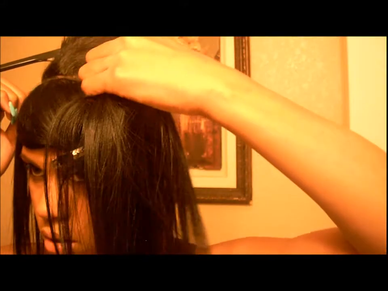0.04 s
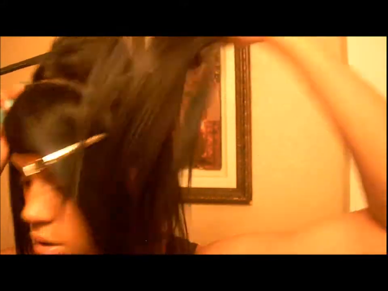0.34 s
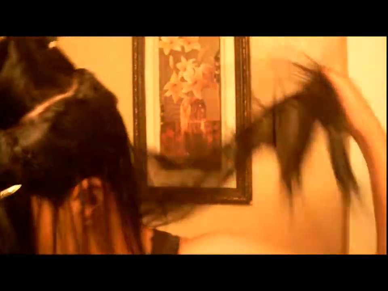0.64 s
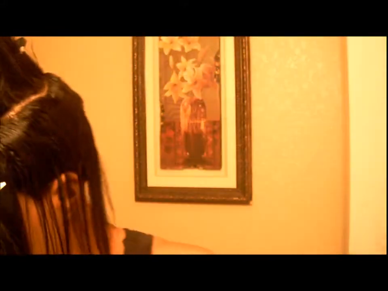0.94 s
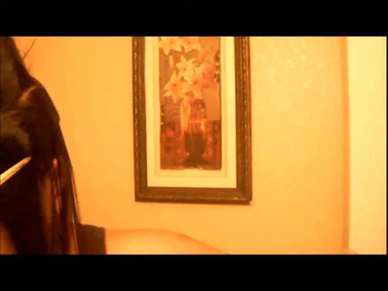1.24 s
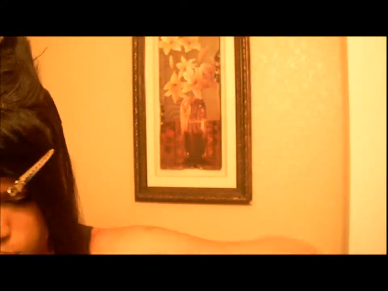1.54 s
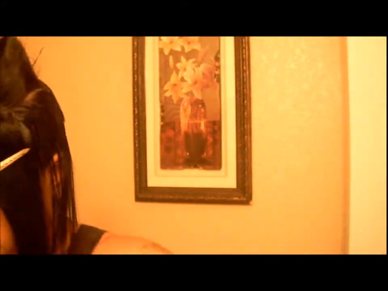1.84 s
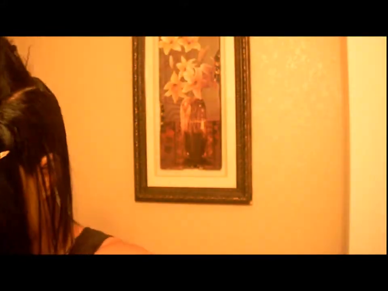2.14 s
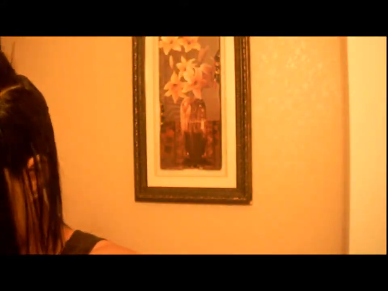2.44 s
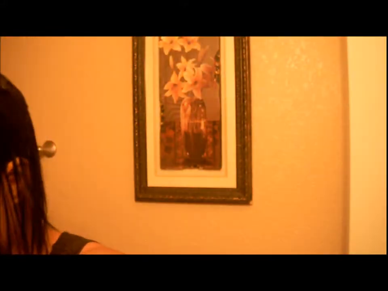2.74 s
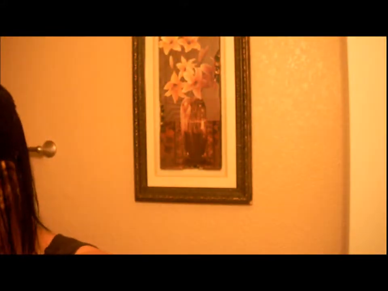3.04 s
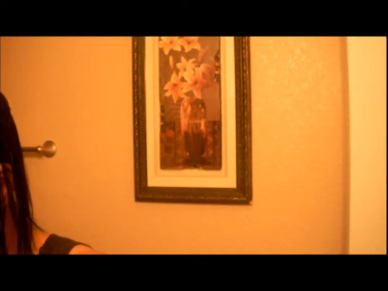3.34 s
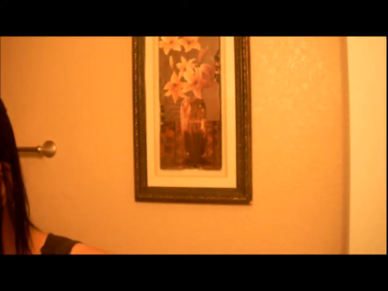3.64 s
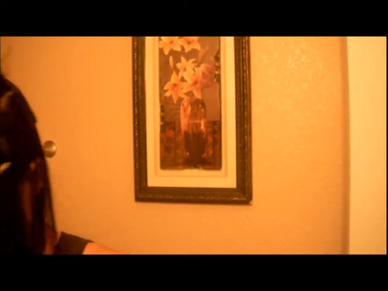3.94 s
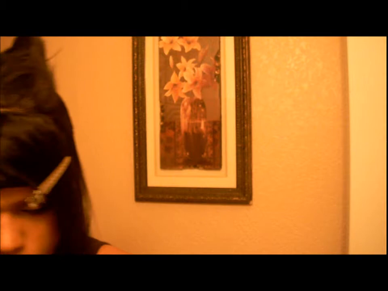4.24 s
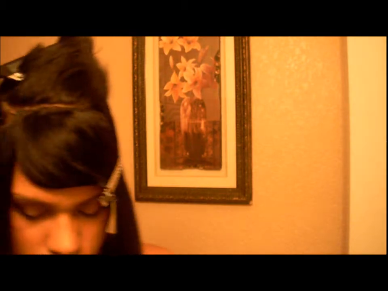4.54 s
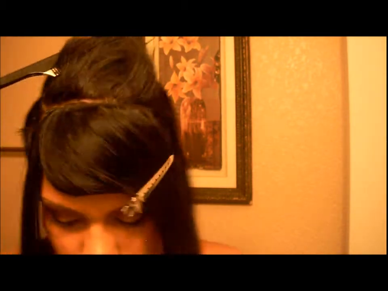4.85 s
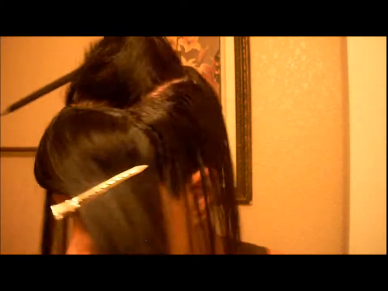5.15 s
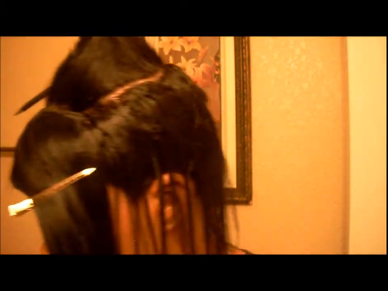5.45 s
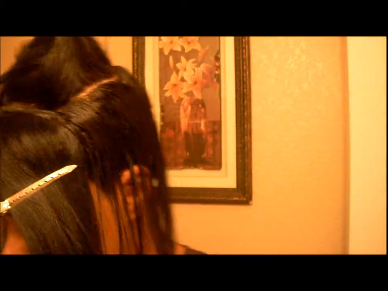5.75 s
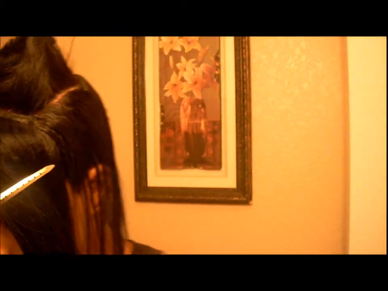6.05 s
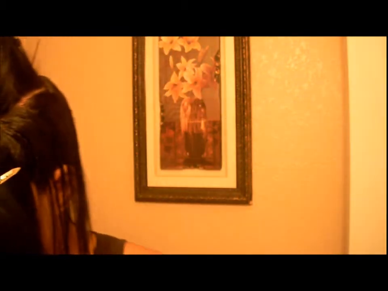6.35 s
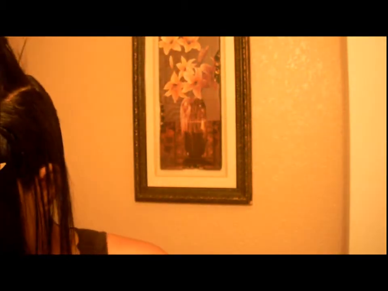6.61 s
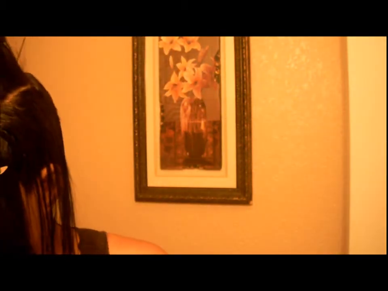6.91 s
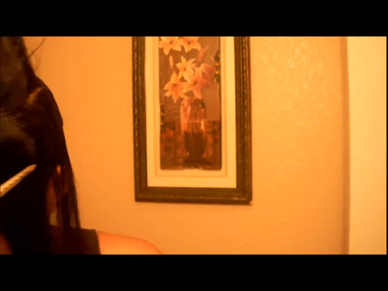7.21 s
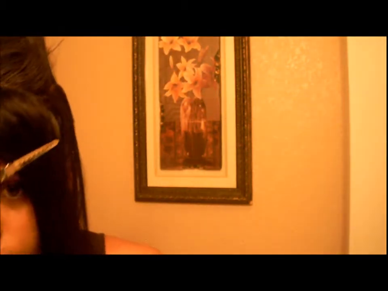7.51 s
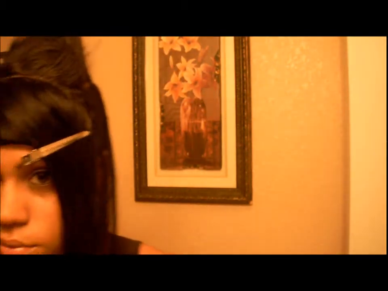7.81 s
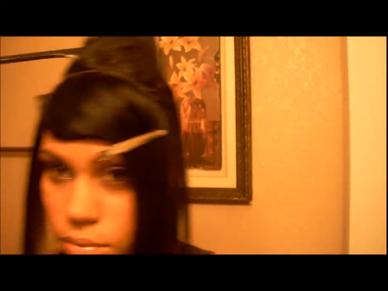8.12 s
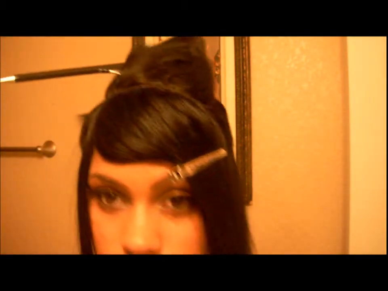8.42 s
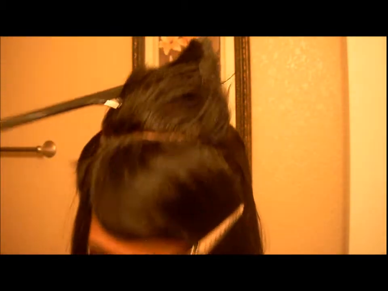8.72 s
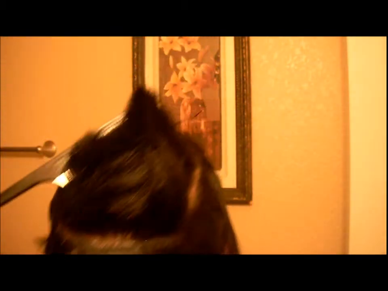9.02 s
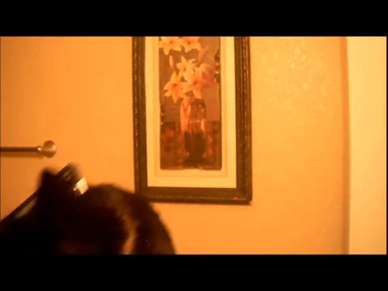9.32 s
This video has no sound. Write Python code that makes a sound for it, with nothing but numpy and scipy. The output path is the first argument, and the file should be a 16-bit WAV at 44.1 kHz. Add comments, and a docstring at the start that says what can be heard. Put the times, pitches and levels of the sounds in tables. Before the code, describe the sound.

In a small, hard-walled bathroom, plastic hair clips tap and snap shut with soft knocks on a counter. A heavy hair tool is put down hard and rattles to rest, the hollow cabinet booming below. After a brief scrape, another clip snaps with a thud, a comb drops and hair rustles faintly. The close microphone adds hiss and a thin, pulsing whine.

```python
"""A heavy hair tool is put down hard on a counter and rattles to rest in a small, hard-walled bathroom.
Its casing cracks, the counter top rings and the hollow cabinet below booms. Around it, plastic clips
snap and tap, a comb drops and padded knocks thud, each exciting resonances and wall reflections.
Plastic scrapes once, briefly; later, hair rustles faintly.
Under it all lie a close camera's hiss and thin, pulsing whine."""
import sys
import numpy as np
from scipy import signal
from scipy.fft import rfft, irfft
from scipy.io import wavfile
from scipy.ndimage import uniform_filter1d

SR = 44100
rng = np.random.default_rng(int(sys.argv[2]) if len(sys.argv) > 2 else 0)


def pcm_store(signal):
    """Save signal as 16-bit PCM."""
    levels = np.round(np.clip(np.atleast_2d(signal), -1, 1) * 32767)
    wavfile.write(sys.argv[1], SR, levels.astype(np.int16).T)


N = 422037
EVENT_N = 32768
AGE_S = np.arange(EVENT_N) / SR
FREQ_HZ = np.maximum(np.arange(EVENT_N // 2 + 1) * SR / EVENT_N, 1)


def undb(db):
    """dB to gain."""
    return 10 ** (np.asarray(db) / 20)


def at_rms(x, db):
    """Scale to an rms level."""
    return x * undb(db) / np.sqrt(np.mean(x ** 2))


def curve(points, hz):
    """Interpolate (f/Hz, value) points over log frequency."""
    point_hz, value = np.transpose(points)
    return np.interp(np.log(hz), np.log(point_hz), value)


def add(out, t_s, sound):
    """Mix in at t_s."""
    start = int(t_s * SR)
    out[start:start + len(sound)] += sound[:N - start]


def convolve(a, b):
    """Convolution cut to one event's length."""
    return signal.fftconvolve(a, b)[:EVENT_N]


def decay(t60_s):
    """Envelope falling 60 dB in t60_s."""
    return np.exp(-np.log(1000) * AGE_S / t60_s)


def pulse(spectrum_db):
    """One contact: the minimum-phase pulse with this spectrum."""
    cepstrum = irfft(spectrum_db * np.log(10) / 20)
    cepstrum[1:EVENT_N // 2] *= 2
    cepstrum[EVENT_N // 2 + 1:] = 0
    return irfft(np.exp(rfft(cepstrum)))


def hump_db(centre_hz, width_oct):
    """Broad resonance of a small, well damped object."""
    return -11 * np.log10(1 + (np.log2(FREQ_HZ / centre_hz) / width_oct) ** 4)


def softness_db(cutoff_hz, order=2):
    """Treble lost in a longer contact."""
    return -10 * np.log10(1 + (FREQ_HZ / cutoff_hz) ** (2 * order))


def ring(modes, detune=0.0016):
    """Decaying modes, slightly detuned at each blow."""
    out = np.zeros(EVENT_N)
    for hz, db, t60_s in modes:
        detuned_hz = hz * (1 + detune * rng.standard_normal())
        out += undb(db) * np.sin(2 * np.pi * detuned_hz * AGE_S) * decay(t60_s)
    return out


def plastic_ring(modes, polarity):
    """Short, wide modes; polarity -1 alternates signs, +1 leaves deep valleys between neighbours."""
    out = np.zeros(EVENT_N)
    for k, (hz, width_hz, db) in enumerate(modes):
        gain = polarity ** k * undb(db) * 2 * np.pi * width_hz / SR
        out += gain * np.sin(2 * np.pi * hz * AGE_S) * np.exp(-np.pi * width_hz * AGE_S)
    return out


def crack(t60_s):
    """Dense, quickly damped modes as a unit-energy noise burst."""
    burst = rng.standard_normal(EVENT_N) * decay(t60_s)
    return burst / np.linalg.norm(burst)


def bathroom(onset_s=0.0024, merge_s=0.014):
    """Wall reflections merge into a tail whose treble dies first."""
    # reverberation: f/Hz, t60/s
    room_decay = [(60, 0.96), (250, 0.35), (700, 0.43), (1500, 0.44), (3000, 0.36), (6000, 0.37),
                  (14000, 0.24)]
    noise, scatter = rng.standard_normal((2, EVENT_N))
    spread = np.exp(-AGE_S / merge_s)  # early reflections stand out singly
    onset = np.minimum(AGE_S / onset_s, 1) ** 2
    echoes = rfft(noise * np.exp(spread * scatter - spread ** 2) * onset)
    centres_hz = np.transpose(room_decay)[0]
    tail = np.zeros(EVENT_N)
    for (_, t60_s), share in zip(room_decay, np.eye(len(centres_hz))):
        fade = decay(t60_s)
        band = irfft(echoes * np.interp(np.log(FREQ_HZ), np.log(centres_hz), share))
        tail += band * fade / np.linalg.norm(fade)
    return tail


def air_path(direct_db):
    """Direct sound plus wall reflections."""
    return undb(direct_db) * (AGE_S == 0) + bathroom()


def hiss(noise_db=-49.5, hum_hz=120, hum_db=-65):
    """Microphone hiss, room rumble and weak mains hum."""
    # noise spectrum: f/Hz, relative density/dB
    colour = [(10, -18), (20, -1.5), (45, -4), (87, -8), (122, -10), (160, -12), (240, -12.5), (450, -17),
              (1000, -20), (1500, -22.5), (2030, -22.5), (3540, -26.5), (7300, -28.5), (15500, -31)]
    hz = np.maximum(np.arange(N // 2 + 1) * SR / N, 1)
    noise = irfft(rfft(rng.standard_normal(N)) * undb(curve(colour, hz)), N)
    hum = np.sin(2 * np.pi * hum_hz * np.arange(N) / SR)
    return at_rms(noise, noise_db) + at_rms(hum, hum_db)


def whine(frame_hz=14.983):
    """Thin tones of the camera's electronics; the strongest pulses at the frame rate."""
    # tones: f/Hz, undipped rms level/dB, dip depth/0-1
    tones = [(5860, -82, 0), (7870, -63.5, 0.66), (11800, -79, 0), (15735, -95, 0)]
    t_s = np.arange(N) / SR
    idle = np.cos(2 * np.pi * (frame_hz * t_s - 1 / 3)) < 0
    dip = uniform_filter1d(idle.astype(float), size=100)
    return sum(at_rms(np.sin(2 * np.pi * hz * t_s), db) * (1 - depth * dip) for hz, db, depth in tones)


def scrape_and_brushes(width_oct=1.0, grain_db=4):
    """A short scrape of plastic, then faint brushes of hair: tiny slips swell and fade in each."""
    # friction strokes: t/s, length/s, level before envelope/dB, centre f/Hz
    strokes = [(5.199, 0.039, -47.5, 2680), (7.59, 0.12, -55.5, 4500), (7.714, 0.11, -53.5, 3080),
               (8.297, 0.058, -49.5, 3780), (8.383, 0.11, -47, 2000)]
    out = np.zeros(N)
    for t_s, length_s, db, hz in strokes:
        slips = rng.standard_normal(EVENT_N) * undb(grain_db * rng.standard_normal(EVENT_N))
        swell = np.sin(np.pi * np.minimum(AGE_S / length_s, 1))
        colour = pulse(hump_db(hz, width_oct))
        friction = convolve(at_rms(slips, db) * swell, colour / np.linalg.norm(colour))
        add(out, t_s, convolve(friction, air_path(direct_db=-1.2)))
    return out


def light_taps(t60_s=0.0062, cutoff_hz=14500, direct_db=-6):
    """Comb and clips tap each other, at a new spot each time."""
    # taps: t/s, level/dB, centre f/Hz
    taps = [(0.989, -3.2, 5140), (1.031, -13, 5500), (1.511, -13.5, 11000), (2.102, -14, 5800),
            (3.417, -6.5, 3600), (3.809, -19, 3600), (5.2, -9, 1300), (6.19, -7.5, 3080),
            (6.549, -12, 2100), (6.556, -1.5, 2240), (6.573, -2, 10500), (7.198, -13, 12000)]
    out = np.zeros(N)
    for t_s, db, hz in taps:
        width_oct = 1.17 * (3970 / hz) ** 0.5  # smaller parts ring higher and narrower
        contact = pulse(db + hump_db(hz, width_oct) + softness_db(cutoff_hz, order=4))
        add(out, t_s, convolve(contact, undb(direct_db) * crack(t60_s) + bathroom()))
    return out


def comb_drop():
    """One end of the comb hits the counter just before the other."""
    # landings: t/s, level/dB, direct over room/dB
    landings = [(7.0882, 6.5, -1), (7.093, 6, -3)]
    # comb resonances: f/Hz, width/Hz, level/dB
    modes = [(620, 160, -7), (1150, 300, -7), (2200, 650, -2), (2590, 310, 2.5), (3620, 520, -3),
             (4580, 540, -2.5), (5800, 1300, -4), (7400, 1250, -4), (8650, 1400, -5.5),
             (10500, 1500, -11.5), (13200, 1500, -13)]
    clack = plastic_ring(modes, polarity=-1)
    out = np.zeros(N)
    for t_s, db, direct_db in landings:
        add(out, t_s, undb(db) * convolve(clack, air_path(direct_db)))
    return out


def hair_clip():
    """A spring shuts the jaws and the plastic rings briefly."""
    # snaps: t/s, level/dB, cutoff/Hz, direct over room/dB
    snaps = [(1.1116, 11, 13000, -2.5), (6.572, 9.5, 3900, -20)]
    # hair clip resonances: f/Hz, width/Hz, level/dB
    modes = [(1170, 36, -12), (1530, 25, 2), (2500, 130, -2), (3200, 120, -3), (3560, 270, -6.5),
             (4600, 280, -2.5), (5270, 380, -3.5), (5930, 510, -8), (6970, 550, -7), (8340, 780, -10),
             (9840, 550, -10), (11400, 640, -16), (14200, 900, -19)]
    out = np.zeros(N)
    for t_s, db, cutoff_hz, direct_db in snaps:
        snap = convolve(pulse(db + softness_db(cutoff_hz)), plastic_ring(modes, polarity=1))
        add(out, t_s, convolve(snap, air_path(direct_db)))
    return out


def cabinet_boom():
    """The hollow cabinet under the counter rings after a blow."""
    # cabinet resonances: f/Hz, level/dB, t60/s
    modes = [(64, -54, .2), (117.5, -46, .44), (140, -50, .3), (214, -54, .35), (251, -53, .58),
             (324, -53, .45), (419, -58, .45), (643, -53, .22), (1070, -57, .25), (1460, -50, .2)]
    return ring(modes)


def counter_knocks(settle_s=0.018, air_db=-4, boom_db=-3.5):
    """Padded blows push on the counter, then settle with a weaker, duller push."""
    # soft contacts: t/s, level/dB, cutoff/Hz
    knocks = [(0.992, 15, 135), (1.043, 11.5, 420), (1.124, 13.5, 292), (3.416, 12, 140),
              (3.4745, 25.5, 140), (6.572, 17.5, 620), (7.0901, 6.5, 420), (7.154, 13, 130),
              (7.198, 8, 700)]
    # knock spectrum: f/Hz, level/dB
    colour = [(25, -20), (70, -9), (120, 1.5), (180, 3.5), (280, 4), (450, 2), (700, 4.5), (1500, 7),
              (16000, 29)]
    out = np.zeros(N)
    for t_s, db, cutoff_hz in knocks:
        delay_s = settle_s * np.exp(0.302 * rng.standard_normal())
        pushes = [(t_s, db, cutoff_hz), (t_s + delay_s, db - 5, cutoff_hz * 0.68)]
        for push_s, push_db, push_hz in pushes:
            push = pulse(push_db + softness_db(push_hz) + curve(colour, FREQ_HZ))
            response = undb(air_db) * air_path(direct_db=-6) + undb(boom_db) * cabinet_boom()
            add(out, push_s, convolve(push, response))
    return out


def heavy_tool(crack_t60_s=0.015, ring_db=-22, boom_db=-4):
    """The tool lands on a hard edge, tips onto its softer side and bounces, ever weaker and duller."""
    # landing and bounces: t/s, level/dB
    blows = [(3.4575, 22.5), (3.466, 17), (3.4758, 11.5), (3.5784, 9.5), (3.618, 2.5), (3.682, -4.5)]
    # impact spectrum: f/Hz, level/dB
    colour = [(40, -4), (90, -13), (250, 4), (480, -6), (700, -1), (880, 3), (1180, -1), (1500, 3.5),
              (2000, -2), (3000, 0), (5000, -4.5), (8000, -4.5), (12000, -4), (16000, -7)]
    # tool and counter top resonances: f/Hz, level/dB, t60/s
    modes = [(783, -37, .42), (819, -36, .3), (885, -33, .5), (942, -35, .3), (1297, -38, .6),
             (1472, -39, .55), (1564, -39, .55), (1663, -39, .4), (1809, -38, .58), (1890, -41, .6),
             (2247, -41, .55), (2363, -41, .5), (2453, -30, .18), (3024, -38, .5), (3076, -32, .3),
             (3189, -33, .45), (4102, -38, .25), (4350, -37, .2), (4974, -39, .2), (5450, -37, .2)]
    edge_hz, side_hz, tip_s = 27000, 1400, 0.049
    landing_s = blows[0][0]
    out = np.zeros(N)
    for t_s, db in blows:
        cutoff_hz = side_hz + (edge_hz - side_hz) * np.exp(-(t_s - landing_s) / tip_s)
        contact = pulse(db + softness_db(cutoff_hz, order=1) + curve(colour, FREQ_HZ))
        ringing = undb(ring_db) * ring(modes) + undb(boom_db) * cabinet_boom()
        casing_db = 3 - 0.36 * db  # its share falls as harder blows drive the whole counter
        casing = undb(casing_db) * crack(crack_t60_s)
        add(out, t_s, convolve(contact, casing + ringing + bathroom()))
    return out


def scene():
    """All sources at one microphone."""
    impacts = light_taps() + hair_clip() + comb_drop() + counter_knocks() + heavy_tool()
    return (impacts + scrape_and_brushes() + hiss() + whine())[None]


def record(dry):
    """The camera rounds the peaks and cuts the top treble."""
    cutoff_hz = 15800
    lowpass = signal.ellip(10, .2, 80, cutoff_hz, fs=SR, output="sos")
    return signal.sosfilt(lowpass, np.tanh(dry))


dry = scene()
out = record(dry)
pcm_store(out)
```